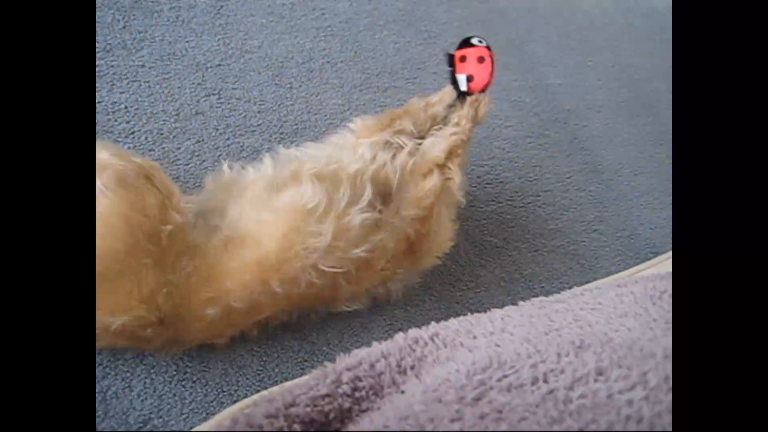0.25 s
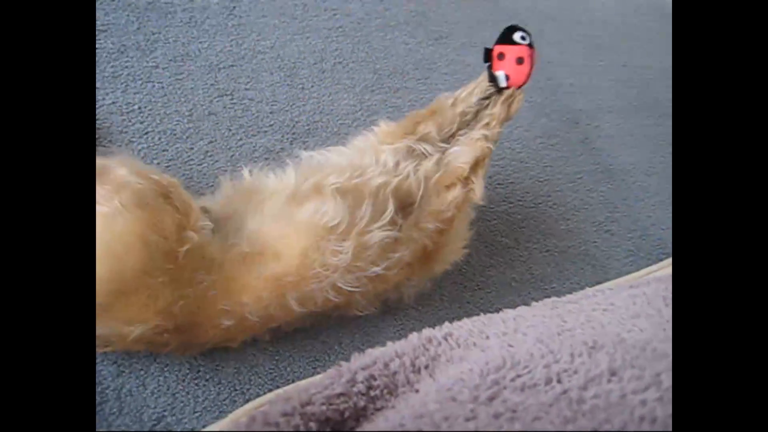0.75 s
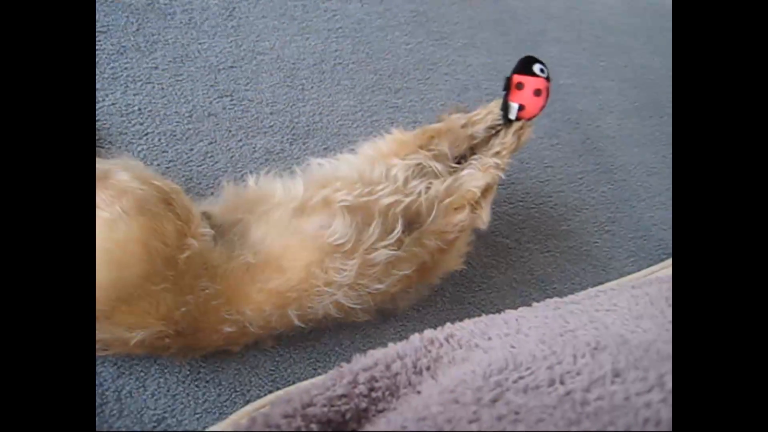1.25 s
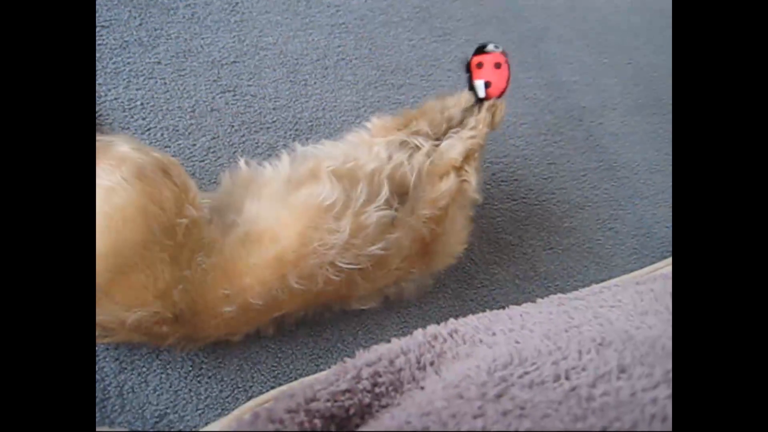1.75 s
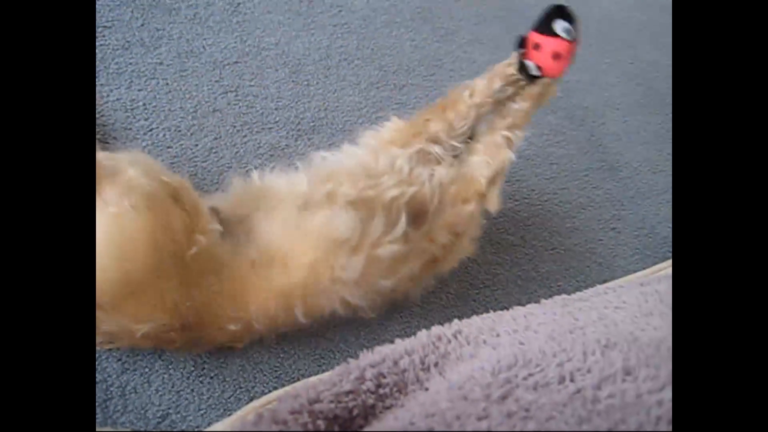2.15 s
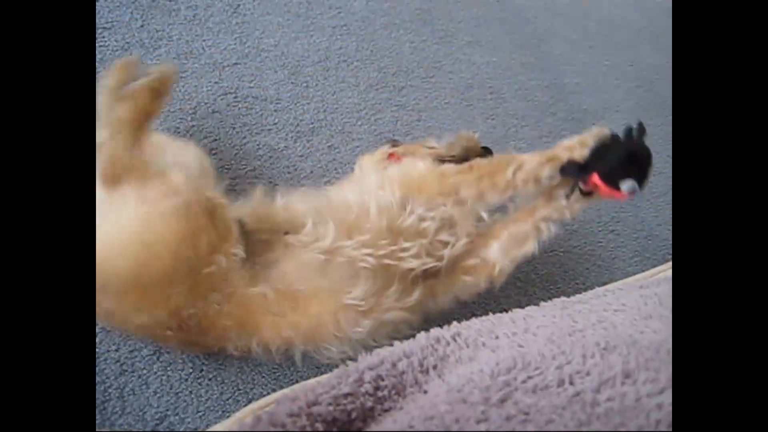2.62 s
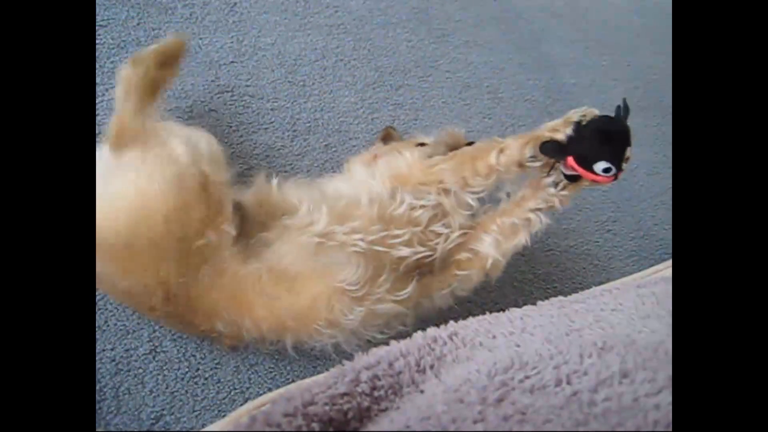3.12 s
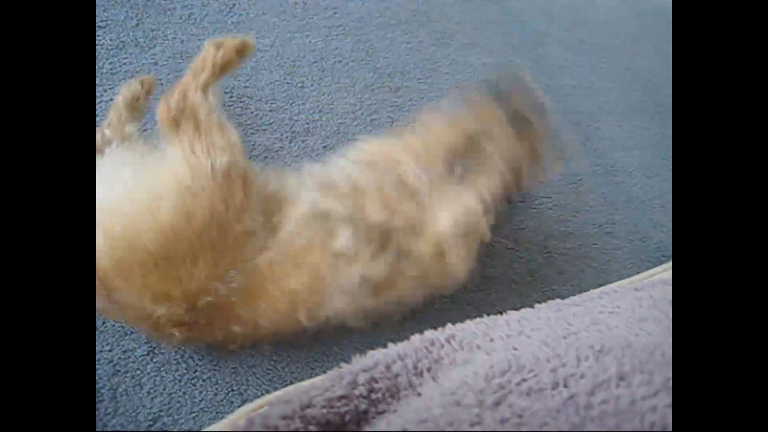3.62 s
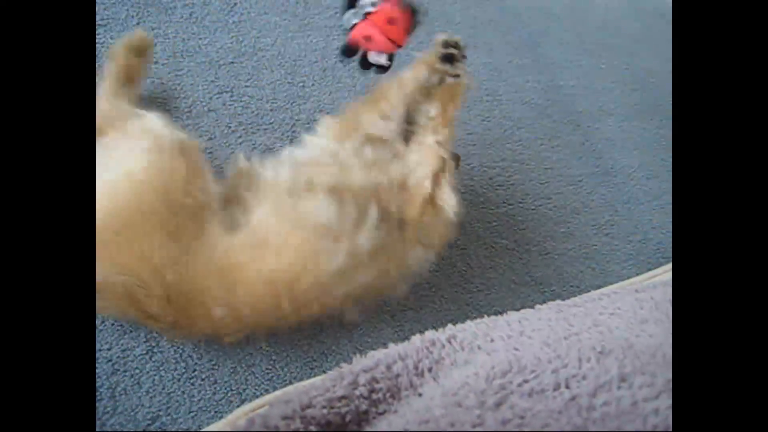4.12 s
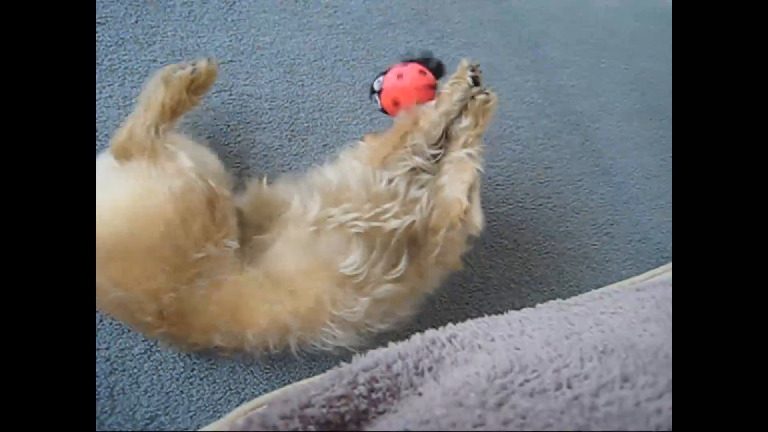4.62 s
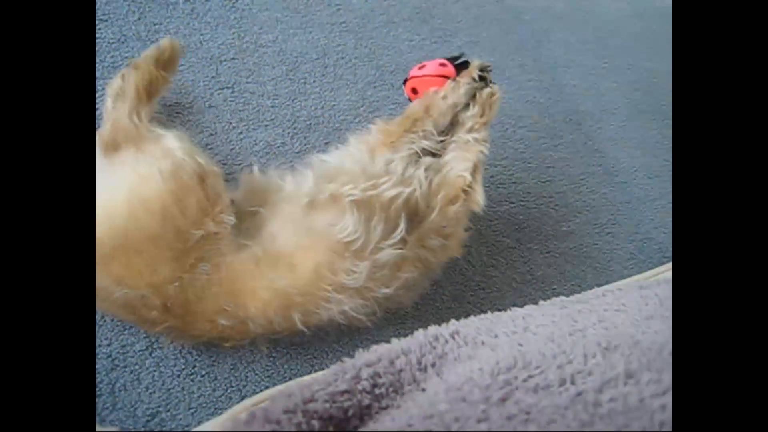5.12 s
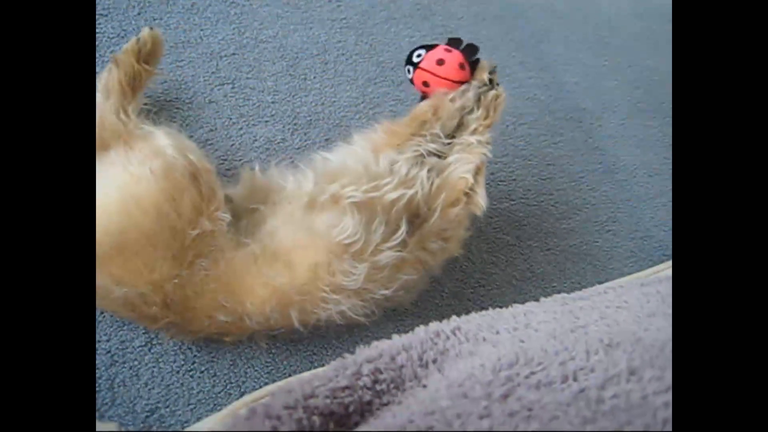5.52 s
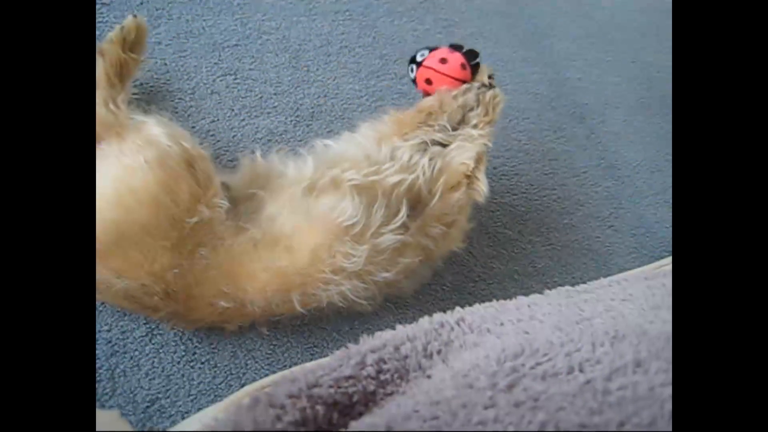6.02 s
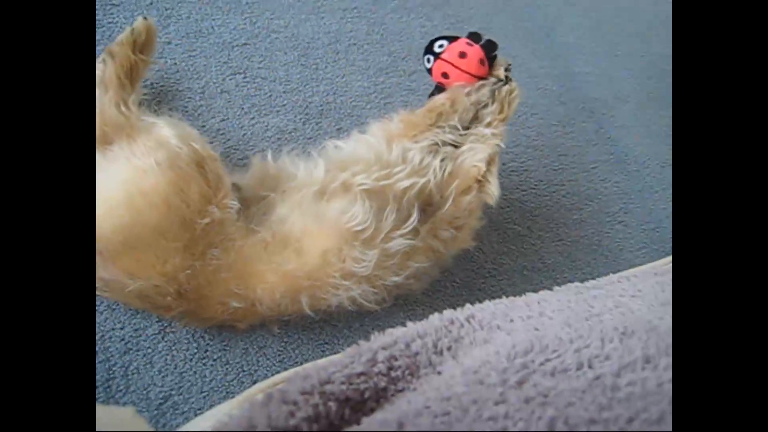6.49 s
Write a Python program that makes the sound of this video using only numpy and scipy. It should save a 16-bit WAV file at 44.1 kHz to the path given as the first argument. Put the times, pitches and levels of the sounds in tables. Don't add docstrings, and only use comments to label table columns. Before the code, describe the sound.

Bright, dry plastic chatter in uneven bursts: a short run, a clicking string pull, a longer buzz, then a rapid rising ratchet whirr and loose clicks. After a near pause, a hard short burst leads to a faster rattle, changing tone as paws roll the toy over and clamp it. The buzz slows into weak knocks. Small carpeted room, small camera microphone with steady hiss.

```python
import sys
import numpy as np
from scipy import signal
from scipy.io import wavfile

SR = 44100
rng = np.random.default_rng(int(sys.argv[2]) if len(sys.argv) > 2 else 0)


def log_audio(samples):
    frames = np.atleast_2d(samples).T
    limited = np.clip(frames, -1, 1)
    pcm = np.round(limited * 32767).astype(np.int16)
    wavfile.write(sys.argv[1], SR, pcm)


def voltage_ratio(decibels):
    exponent = np.asarray(decibels, float) / 20
    return 10 ** exponent


N = 297675
TURNED_S, GRIPPED_S = 4.45, 5.14


def read(points, x):
    at, value = np.transpose(points)
    return np.interp(x, at, value)


def moments(table, counts):
    return read(np.fliplr(table), counts)


def split(x, s):
    before = np.arange(N) < s * SR
    return x * before, x * ~before


def coloured(x, points):
    hz, db = np.transpose(points)
    bins = np.fft.rfftfreq(4096, 1 / SR)
    half = np.interp(np.log(bins + 1), np.log(hz + 1), db, -70, -70)
    log_gain = np.r_[half, half[-2:0:-1]] * np.log(10) / 20
    taps = np.fft.ifft(np.exp(np.conj(signal.hilbert(log_gain)))).real[:2048]
    return signal.oaconvolve(x, taps / np.linalg.norm(taps))[:N]


def blows(s, db, contact_ms, swell, spread_db, chatter_db, alike=0, band=(2500, 7000)):
    length = 400
    noise = rng.standard_normal((len(s) + 1, 2 * length + 1))
    noise = alike * noise[0] + np.sqrt(1 - alike ** 2) * noise[1:]
    grain, chatter, spread = noise[:, :length], noise[:, length:-1], noise[:, -1]
    u = np.arange(length) * 1000 / SR / np.reshape(contact_ms, (-1, 1))
    force = grain * voltage_ratio(chatter_db * chatter) * (u + .05) ** swell * np.exp(-u)

    sos = signal.butter(2, band, "band", fs=SR, output="sos")
    share = 2 * (band[1] - band[0]) / SR
    in_band = np.linalg.norm(signal.sosfilt(sos, force), axis=1)
    gain = voltage_ratio(db + spread_db * spread) * np.sqrt(share) / in_band
    force *= gain[:, None]

    out = np.zeros(N + length)
    first = np.clip(np.round(s * SR).astype(int), 0, N)
    np.add.at(out, first[:, None] + np.arange(length), force)
    return out[:N]


# t/s, turns made
RUN_TURNS = [
    [(-0.0045, -0.06), (0.1095, 3.94), (0.168, 5.94), (0.371, 12.94), (0.524, 17.94), (0.642, 21.94)],
    [(0.934, 0.02), (1.11, 6.02), (1.427, 17.02), (1.717, 27.02), (1.777, 29.02), (1.901, 33.02)],
    [(3.635, 5.92), (3.871, 14.92), (3.952, 17.92)],
    [(4.047, 1), (4.139, 5), (4.262, 10), (4.332, 13), (4.436, 17), (4.537, 21), (4.643, 25)],
    [(4.537, 21), (4.643, 25), (4.744, 29), (4.771, 30), (4.981, 38), (5.095, 42), (5.156, 44)],
    [(5.095, 42), (5.374, 51), (5.546, 56), (5.7285, 62), (6.032, 71), (6.181, 75), (6.316, 79),
     (6.492, 84), (6.726, 90)],
]
# start t/s, end t/s
RUN_SPANS = [(0, .62), (.97, 1.9), (3.67, 3.94), (4.075, 4.56), (4.56, 5.14), (5.14, 6.695)]
# t/s, rattle level/dB, slam level/dB
EARLY_HOLD = [
    [(0, -13, -19), (.03, -10, -11), (.053, -13, -3.5), (.14, -11, -3), (.315, -9, -4), (.373, -17, -15),
     (.434, -16.5, -16), (.495, -27, -32), (.6, -34, -45)],
    [(.97, -32, -39), (1.05, -15, -23), (1.1, -8, -15), (1.225, -15.5, -22), (1.34, -7, -9), (1.37, -7, -5),
     (1.69, -7, -8), (1.78, -18, -27), (1.87, -30, -46)],
    [(3.66, -7, -6), (3.715, -3, 2), (3.8, -3.5, -3), (3.873, -4, -0.5), (3.95, -10, -5)],
]
# t/s, rattle level/dB, slam level/dB
LAST_HOLD = [
    [(4.07, -4, -7.5), (4.116, 0, -5), (4.19, -2, 1), (4.26, -4, -1.5), (4.33, -5, 0), (4.56, -2.5, -3)],
    [(4.56, -2, -8), (4.62, -1.4, -2), (4.7, -6.5, -4), (4.75, -16, -7.5), (4.78, -1.5, -2.5),
     (4.83, -9, -6), (4.95, -9, -4), (5.01, -17, -6), (5.14, -21, -15.5)],
    [(5.31, -27.5, -13.5), (5.47, -28, -31.5), (5.54, -17, -14), (5.72, -16, -12), (5.85, -22, -23.5),
     (6.1, -29, -26), (6.3, -36, -12), (6.4, -17.5, -28), (6.6, -34, -35)],
]
KNOCK_PLACES = [(-.055, .165, .475, .65), (-.045, .175, .455, .655), (-.01, .205, .44, .705),
                (-.025, .185, .445, .705), (-.03, .22, .46, .715), (-.03, .22, .46, .715)]
# rebound, third, fourth level/dB
KNOCK_BALANCE = [(3, -2.5, 3.5), (2.5, -9, 1), (-6, -0.9, -1), (2, -2.5, -7.5), (-1.5, -1.2, -6),
                 (-6, -0.5, -18)]
SLAM_LENGTHS = (0.98, 0.97, 0.84, 0.59, 0.92, 0.92)
SLAM_SWELLS = (2.4, 2.85, 1.53, 2.44, 1.5, 0.77)
BODY_LEVELS = (-13, -12, -13.5, -13.5, -12, -19.5)
BODY_DRIVES = (4, -3.5, -7.5, 5)


def run_knocks(run):
    turns = RUN_TURNS[run]
    start, end = RUN_SPANS[run]
    whole = np.arange(np.ceil(turns[0][1]), turns[-1][1])
    jitter = .008 * rng.standard_normal((len(whole), 4))
    s = moments(turns, whole[:, None] + KNOCK_PLACES[run] + jitter)
    on = (s >= start) & (s < end)

    at, rattle_db, slam_db = np.transpose((EARLY_HOLD + LAST_HOLD)[run])
    rattle_db = np.interp(s[:, :1], at, rattle_db)
    slam_db = np.interp(s[:, :1], at, slam_db)
    db = np.c_[slam_db + 1.5, rattle_db + KNOCK_BALANCE[run]]

    is_slam = np.arange(4) == 0
    contact_ms = np.where(is_slam, SLAM_LENGTHS[run], 0.69) + 0 * s
    swell = np.where(is_slam, SLAM_SWELLS[run], 0.56) + 0 * s
    lagged = s + .0006 * ~is_slam
    force = blows(lagged[on], db[on], contact_ms[on], swell[on][:, None],
                  spread_db=0.94, chatter_db=2.5, alike=0.26)

    body_db = BODY_LEVELS[run] + 0.69 * slam_db + 0.28 * rattle_db + BODY_DRIVES
    shake = blows(s[on] - .0008, body_db[on], .4, 1, spread_db=2, chatter_db=0, band=(900, 1600))
    return force, shake


# t/s, peak level/dB, hollow body level/dB
STRAY_KNOCKS = [(1.7962, -22.5, -15.5), (1.811, -40, -22), (3.502, -31, -26), (3.5291, -32, -13),
                (3.5374, -32, -31), (3.5513, -27, -16), (3.5612, -29, -14), (3.568, -25, -14),
                (3.5767, -15, -7.5), (3.58, -23, -9), (3.5874, -13.5, -17), (3.5916, -18, -20),
                (3.679, -18, -12), (3.993, -16.5, -14), (4.003, -14, -23), (4.0143, -22, -28),
                (4.037, -13, -27), (4.0512, -15, -38), (4.062, -19, -9), (4.0833, -12.5, -29),
                (4.0857, -24, -29), (5.9984, -21.5, -15.5), (6.004, -26, -12), (6.1815, -19.5, -22),
                (6.199, -26, -24), (6.232, -28, -24), (6.7032, -23, -30), (6.721, -22.5, -22),
                (6.736, -23.5, -29)]
# start t/s, gap/s, count
BRAKED_KNOCKS = [
    (3.6045, .0123, 6),
    (3.945, .0122, 4),
]


def stray_knocks():
    braked = [(start + gap * k, -23, -15) for start, gap, count in BRAKED_KNOCKS for k in range(count)]
    s, peak_db, body_db = np.transpose(STRAY_KNOCKS + braked)
    force = blows(s, peak_db + 10.5, 0.79, 0.91, spread_db=0, chatter_db=0.5)
    shake = blows(s, peak_db + body_db + 12, .5, 1, spread_db=0, chatter_db=0, band=(900, 1600))
    return force, shake


# f/Hz, level/dB
FAR_SPECTRUM = [(1000, -64), (1700, -12.5), (1980, -12), (2570, -5.5), (3920, -7), (4910, 2), (6030, -8.5),
                (9110, -17.5), (10100, -29), (14600, -34), (16000, -44)]
# f/Hz, level/dB
NEAR_SPECTRUM = [(1000, -40), (1700, -2.5), (1920, -8.5), (2450, -1.5), (2960, -2.5), (4910, 2),
                 (5810, -4.5), (7070, -5.5), (8380, -14.5), (12300, -24), (16000, -35)]
# f/Hz, level/dB
TURNED_SPECTRUM = [(1000, -63), (1700, -6), (3100, -1), (3990, 0), (4730, 9), (5700, 1.5), (7140, -1),
                   (9820, -19.5), (14800, -25.5), (16000, -43)]
# f/Hz, level/dB
GRIPPED_SPECTRUM = [(1000, -9.5), (1800, -11.5), (2900, -3), (3800, -9), (4900, 0.5), (6500, -9.5),
                    (7500, -10), (9000, -21), (16000, -49)]
# f/Hz, level/dB
BODY_SPECTRUM = [(600, -16.5), (850, -1.5), (1100, 4.5), (1280, 11), (1450, 5.5), (1800, -11.5), (2600, -2)]


def weight():
    forces, shakes = zip(*[run_knocks(run) for run in range(len(RUN_SPANS))])
    stray_force, stray_shake = stray_knocks()
    near, later = split(sum(forces[2:]) + stray_force, TURNED_S)
    turned, gripped = split(later, GRIPPED_S)
    shell = voltage_ratio(1.0) * coloured(forces[0] + forces[1], FAR_SPECTRUM)
    shell += voltage_ratio(-0.2) * coloured(near, NEAR_SPECTRUM)
    shell += voltage_ratio(1.1) * coloured(turned, TURNED_SPECTRUM)
    shell += voltage_ratio(0.6) * coloured(gripped, GRIPPED_SPECTRUM)
    return shell + coloured(sum(shakes) + stray_shake, BODY_SPECTRUM)


TICK_LEVELS = (-36, -39, -22, -16.5, -23, -28.5)
# f/Hz, level/dB
GEAR_SPECTRUM = [(2500, -13), (4500, -10), (5500, -7.5), (7200, -1), (8200, -13), (10000, -19),
                 (14000, -42)]


def gears():
    force = 0
    for turns, (start, end), db in zip(RUN_TURNS, RUN_SPANS, TICK_LEVELS):
        s = moments(turns, np.arange(turns[0][1], turns[-1][1], 1 / 6))
        s = s[(s > start) & (s < end)]
        s = s + .0004 * rng.standard_normal(len(s))
        throb_db = 2 * np.cos(2 * np.pi * (read(turns, s) - .3))
        force = force + blows(s, db + throb_db, .15, 1, spread_db=2, chatter_db=0, band=(5500, 8500))
    return coloured(force, GEAR_SPECTRUM)


# t/s, ratchet teeth passed
PULL_TEETH = [
    [(0.6339, 0.0), (0.6625, 2.0), (0.7176, 7.0), (0.7322, 9.0), (0.7608, 14.0), (0.787, 18.0),
     (0.8185, 22.0), (0.8403, 24.0)],
    [(1.9092, 0.0), (1.9492, 4.0), (1.9903, 10.0), (2.0351, 20.0), (2.0711, 28.0), (2.0972, 35.0),
     (2.1839, 56.0), (2.2409, 71.0), (2.2705, 76.0)],
    [(2.6189, 0.0), (2.6386, 2.0), (2.6593, 5.0), (2.6867, 11.0), (2.7025, 15.0), (2.7157, 17.0)],
]
# t/s, click level/dB
PULL_FORCE = [
    [(.63, -5.5), (.71, -12.5), (.76, -5), (.79, -10), (.845, -9.5)],
    [(1.905, -8.5), (1.99, -10.5), (2.015, -3.5), (2.045, -8), (2.11, -3.5), (2.14, -8), (2.165, -2),
     (2.19, -8), (2.25, -4.5)],
    [(2.615, -7.5), (2.665, -7), (2.69, -7.5), (2.72, -9)],
]
# t/s, peak level/dB
SINGLE_CLICKS = [(0.6045, -35), (0.8904, -29), (2.2837, -15), (2.2914, -26), (2.3535, -34), (2.363, -31),
                 (2.5346, -32), (2.5526, -18), (2.5636, -18), (2.5726, -18), (2.5844, -19), (2.5904, -29),
                 (2.7194, -24), (2.7736, -35), (3.1737, -24), (3.1814, -28), (3.2086, -19), (3.2154, -25),
                 (3.2276, -25), (3.2334, -23), (3.243, -23), (3.2484, -23), (3.2635, -20), (3.2684, -27),
                 (3.2889, -20), (3.2964, -32), (3.3014, -29), (3.3648, -15), (3.3764, -30)]
# f/Hz, level/dB
PAWL_AWAY_SPECTRUM = [(1300, -34), (2300, -11), (3700, -6.5), (4650, -0.5), (5400, -6), (6300, -1.5),
                      (7300, -13), (8150, -12.5), (9200, -23), (10400, -20.5), (11800, -27.5),
                      (13200, -21.5), (14600, -25), (16300, -40)]
# f/Hz, level/dB
PAWL_FACING_SPECTRUM = [(760, -46), (1300, -35), (1790, -21.5), (2330, -11.5), (3230, -11.5), (3710, -6),
                        (5320, -5.5), (7010, -8.5), (8300, -11.5), (9230, -19.5), (9730, -13),
                        (10400, -13.5), (11300, -20), (15000, -22), (16400, -39)]


def ratchet():
    s, peak_db = np.transpose(SINGLE_CLICKS)
    force = blows(s, peak_db + 11.5, 1.6, 0.38, spread_db=0, chatter_db=6.5)
    creep_s = rng.uniform(2.97, 3.1, 10)
    force = force + blows(creep_s, -23.5, 1, .5, spread_db=3, chatter_db=2)
    for teeth, pull in zip(PULL_TEETH, PULL_FORCE):
        s = moments(teeth, np.arange(teeth[-1][1] + 1))
        s = s + .0002 * rng.standard_normal(len(s))
        force = force + blows(s, read(pull, s), 1.35, .2, spread_db=2.2, chatter_db=3, alike=.35)
    away, facing = split(force, 2.45)
    return coloured(away, PAWL_AWAY_SPECTRUM) + coloured(facing, PAWL_FACING_SPECTRUM)


# t/s, f/Hz, level/dB, t60/s
SPRING_RING = (3.4905, 4400, -43, .03)


def ping():
    s, hz, db, t60 = SPRING_RING
    t = np.maximum(np.arange(N) / SR - s, 0)
    onset = np.minimum(t / 0.0014, 1)
    return voltage_ratio(db - 60 * t / t60) * onset * np.sin(2 * np.pi * hz * t)


# f/Hz, t60/s
ROOM_DECAY = [(500, .4), (4000, .3), (12000, .12)]


def room(x):
    taps = np.zeros(SR // 2)
    at = np.arange(260, len(taps) - 20, 20)
    taps[at + rng.integers(0, 20, len(at))] = rng.choice([-1., 1.], len(at))
    hz, t, z = signal.stft(taps, SR, nperseg=128)
    decay = voltage_ratio(-60 * t / read(ROOM_DECAY, hz)[:, None])
    tail = signal.istft(z * decay, SR, nperseg=128)[1]
    return signal.fftconvolve(x, tail / np.linalg.norm(tail))[:N]


# f/Hz, level/dB
HISS_SPECTRUM = [(20, -7), (36, 2), (60, -0.5), (250, -1), (500, -2.5), (1000, -5.5), (2000, -7.5),
                 (5000, -10), (6500, -13.5), (8500, -15), (12500, -18.5), (14800, -12), (15700, -13),
                 (16000, -50)]
# f/Hz, level/dB
WHINE_LINES = [(15120, -78), (15150, -73)]


def hiss():
    t = np.arange(N) / SR
    out = voltage_ratio(-51.5) * coloured(rng.standard_normal(N), HISS_SPECTRUM)
    for hz, db in WHINE_LINES:
        out += voltage_ratio(db + 3) * np.sin(2 * np.pi * (hz * t + rng.random()))
    return out


def scene():
    buzz = weight() + gears()
    pawl = ratchet() + ping()
    loose, gripped = split(buzz, GRIPPED_S)
    tail = room(voltage_ratio(-14.5) * loose + voltage_ratio(-12.5) * gripped + voltage_ratio(-16.5) * pawl)
    return (buzz + pawl + tail + hiss())[None]


def top_cut(x):
    return signal.sosfilt(signal.butter(12, 16510, fs=SR, output="sos"), x)


def record(dry):
    return top_cut(dry)


dry = scene()
out = record(dry)
log_audio(out)
```